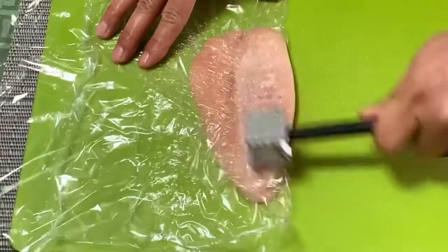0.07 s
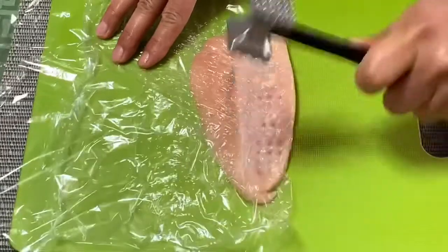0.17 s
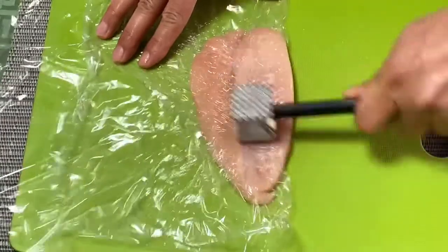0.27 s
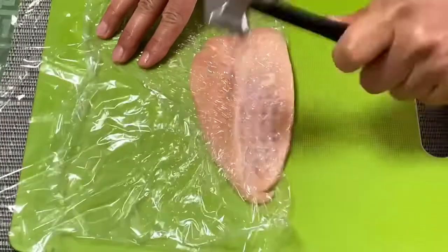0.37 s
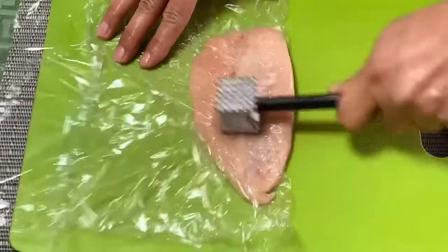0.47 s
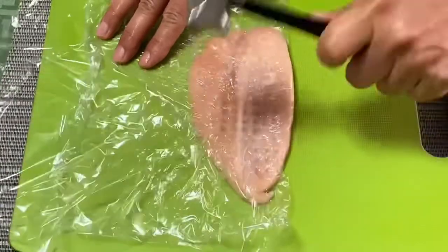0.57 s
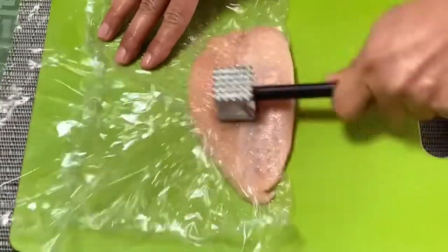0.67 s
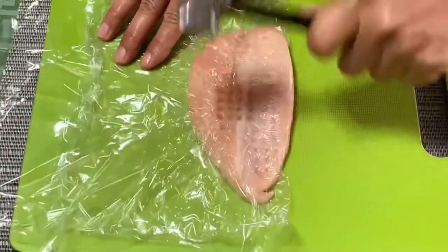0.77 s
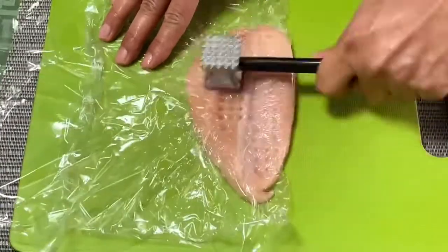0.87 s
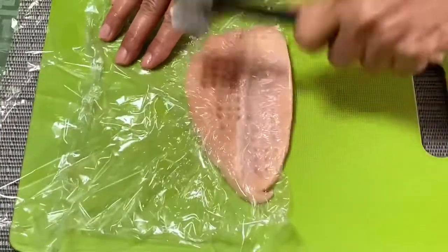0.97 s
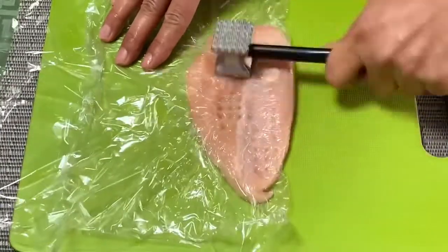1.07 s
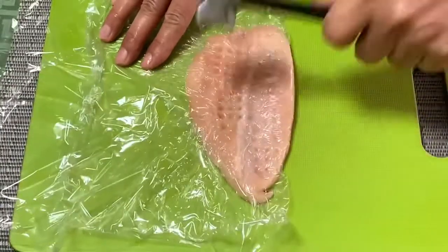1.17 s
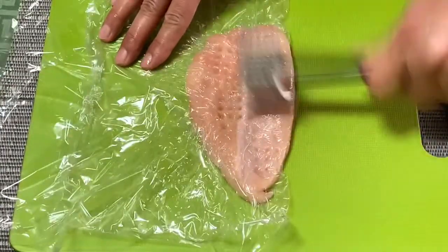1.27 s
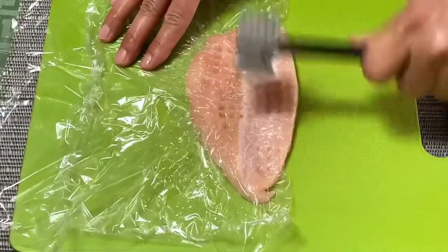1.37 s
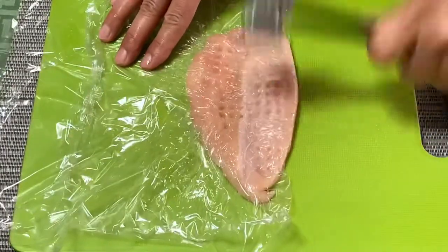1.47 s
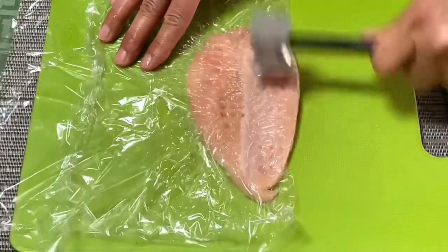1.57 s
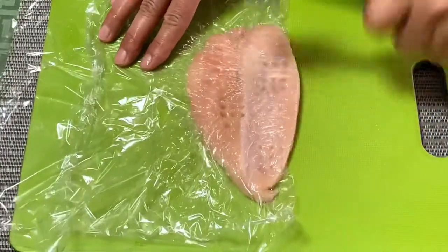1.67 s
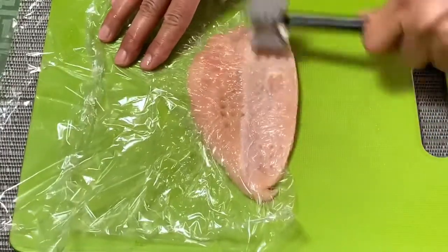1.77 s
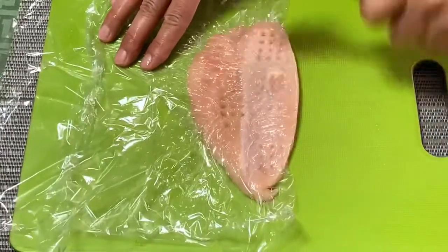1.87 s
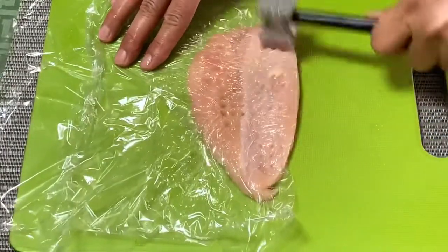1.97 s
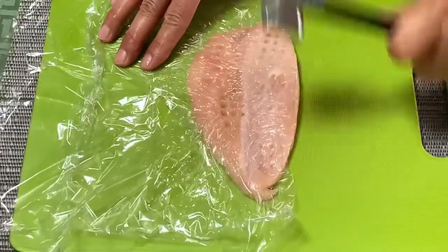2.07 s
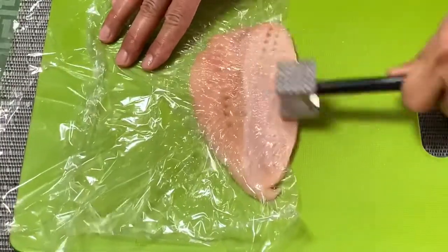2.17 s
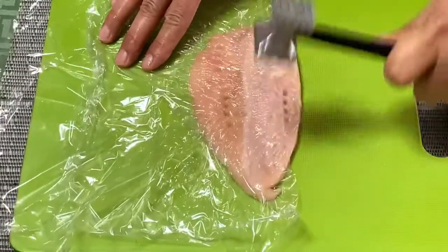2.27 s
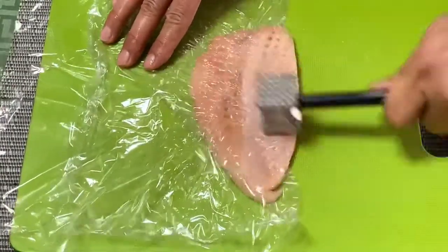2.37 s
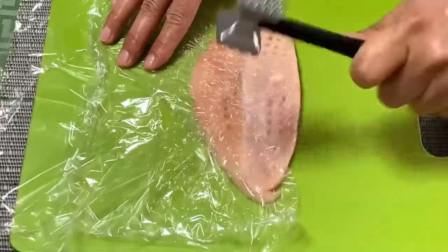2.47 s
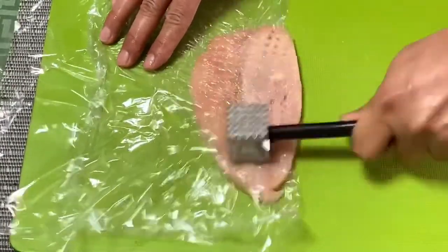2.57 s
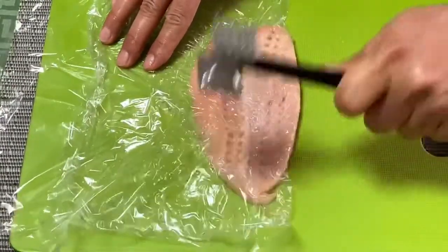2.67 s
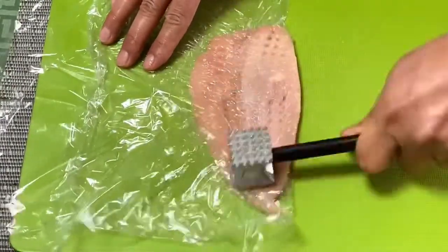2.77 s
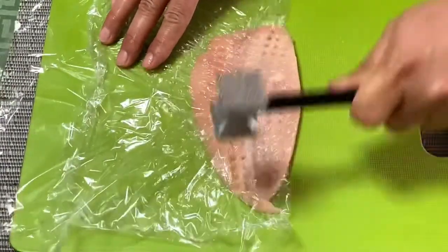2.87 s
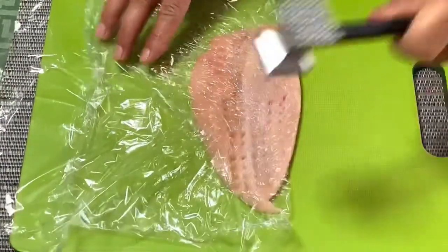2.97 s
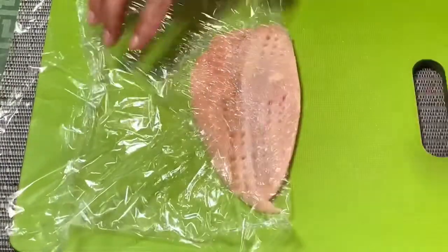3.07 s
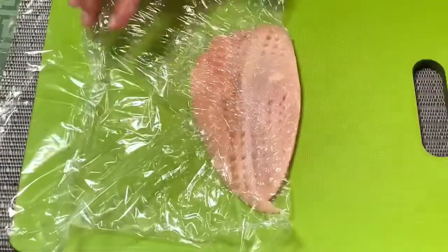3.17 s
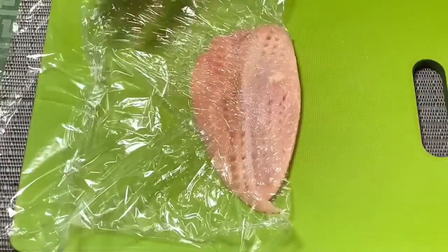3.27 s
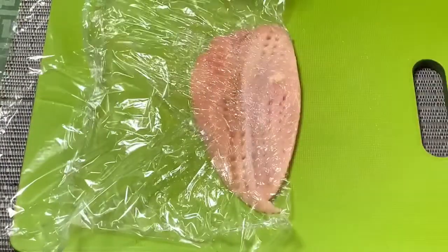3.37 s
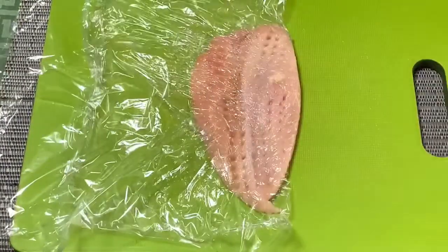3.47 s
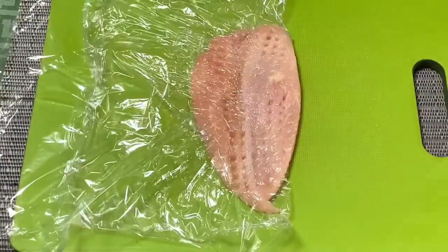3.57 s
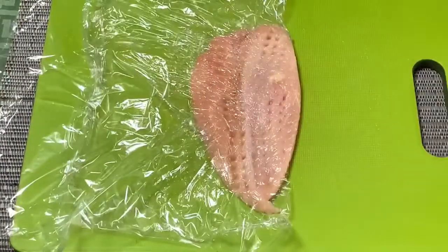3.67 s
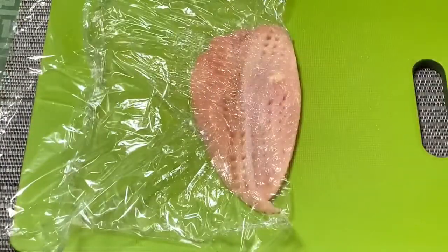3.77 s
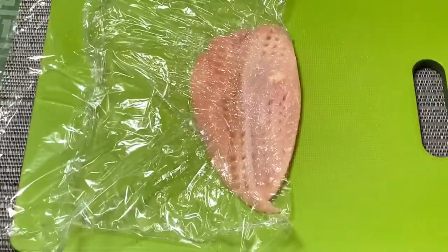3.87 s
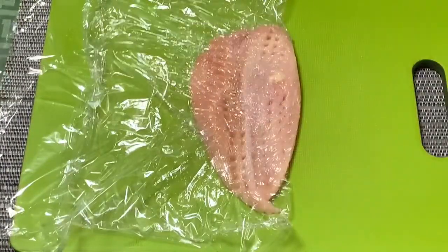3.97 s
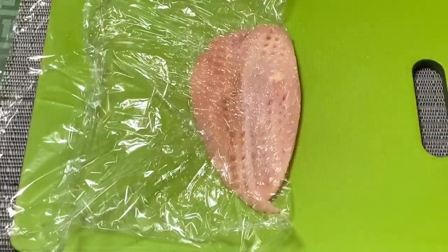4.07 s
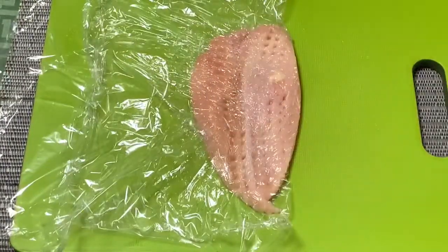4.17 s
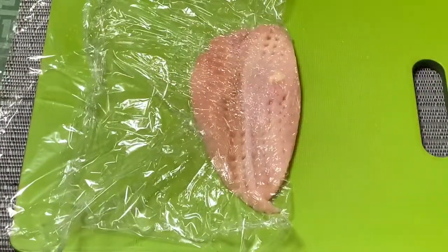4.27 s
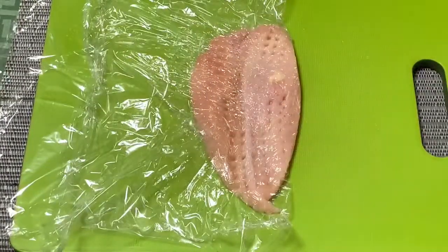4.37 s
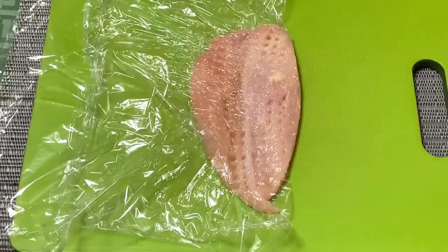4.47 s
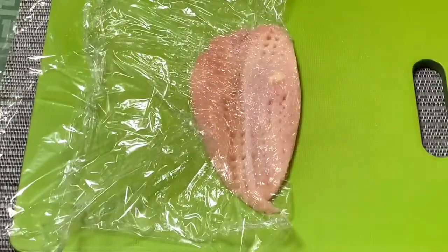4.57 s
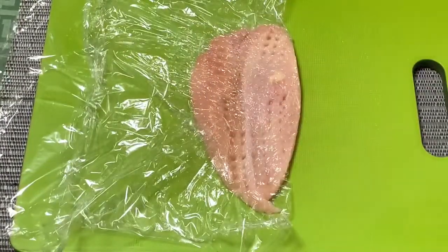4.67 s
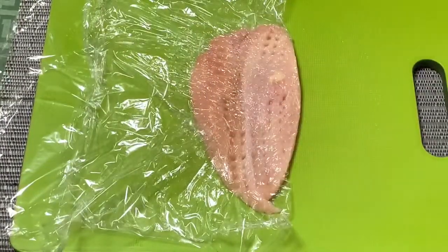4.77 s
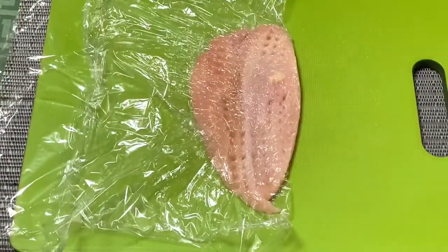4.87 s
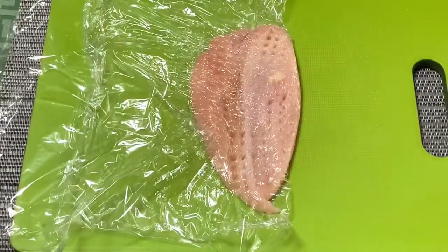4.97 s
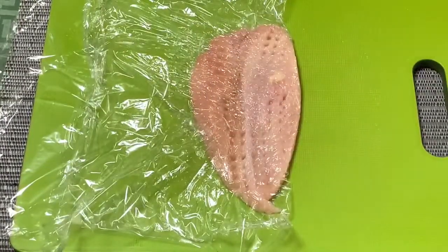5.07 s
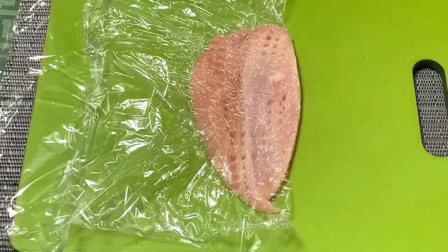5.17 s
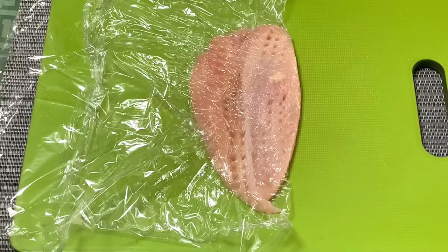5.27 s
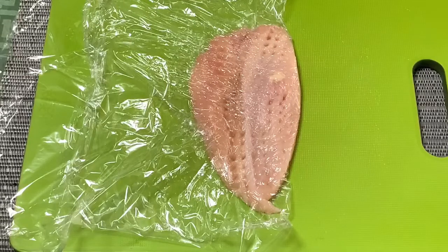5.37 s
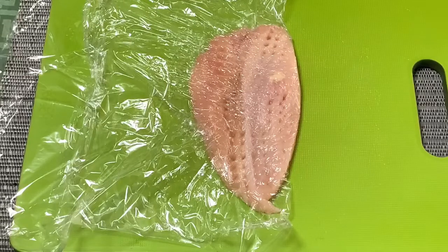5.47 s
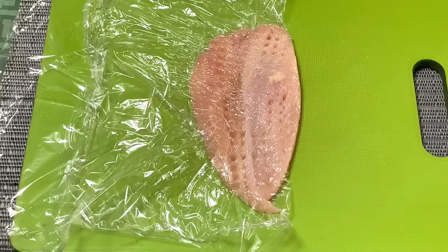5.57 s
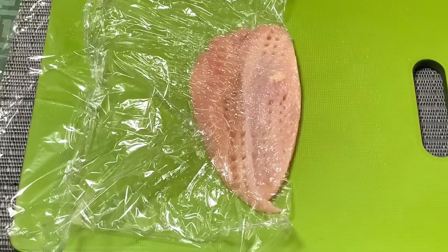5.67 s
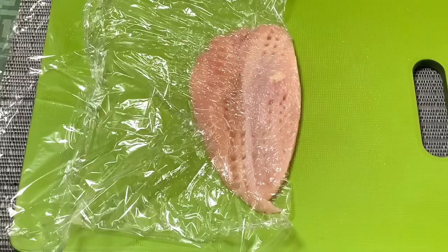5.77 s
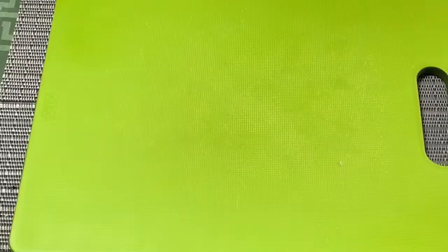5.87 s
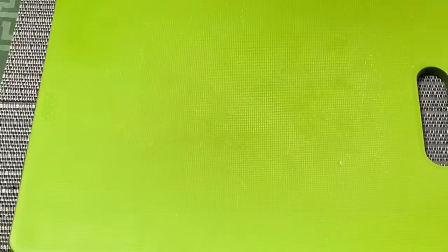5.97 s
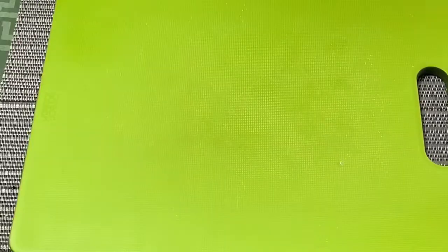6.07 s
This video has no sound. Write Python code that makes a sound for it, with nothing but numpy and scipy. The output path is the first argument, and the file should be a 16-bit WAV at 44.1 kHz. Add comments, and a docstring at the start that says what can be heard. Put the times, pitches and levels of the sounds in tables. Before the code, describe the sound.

From the very start, a metal mallet pounds chicken breast through plastic wrap on a plastic cutting board. About fourteen loud blows fall evenly, nearly five a second, the last at about 2.7 seconds. Each combines a bright crack on the wrap with a slap and a low, ringing thud from the board and counter, followed by a short kitchen echo. The blows are a little softer around 1 second and just after 2 seconds. The close microphone overloads slightly on the peaks.

From 3 seconds it is much quieter: a low appliance rumble and hum, with soft, grainy plastic rustling that comes and goes, mostly between 3.7 and 5 seconds. A few small ticks fall between 4 and 4.7 seconds, the clearest near 4.3. Around 5.8 to 6 seconds come another brief rustle, light ticks and a soft tap as the rumble sinks.

```python
"""Kitchen: a metal mallet pounds chicken breast through plastic wrap on a plastic board. Each blow cracks on
the wrap, sends a falling bending wave through board and counter and rings them. The room echoes; a phone close
above overloads. Afterwards only an appliance rumble and soft rustling with small ticks remain. Near the end the
background drops."""
import sys
import numpy as np
from scipy import signal
from scipy.fft import rfft, irfft, next_fast_len
from scipy.io import wavfile
from scipy.ndimage import uniform_filter1d

SR = 44100
rng = np.random.default_rng(int(sys.argv[2]) if len(sys.argv) > 2 else 0)


def transcribe(signal):
    """Save signal, clipped to [-1, 1], as a 16-bit WAV file at the path in sys.argv[1]."""
    frames = np.atleast_2d(signal).T
    limited = np.clip(frames, -1, 1)
    pcm = np.round(limited * 32767).astype(np.int16)
    wavfile.write(sys.argv[1], SR, pcm)


N = 269450
BLOW_N = 2 ** 14
BLOW_TIME_S, BLOW_FREQ_HZ = np.arange(BLOW_N) / SR, np.fft.rfftfreq(BLOW_N, 1 / SR) + 1e-3
LEFT_RIGHT = np.array([[1], [-1]])


def undb(db):
    """dB to gain."""
    return 10 ** (np.asarray(db) / 20)


def unit(x):
    """Scale to rms 1."""
    return x / np.sqrt(np.mean(x ** 2))


def decay(t, t60_s):
    """Exponential fall, 60 dB in t60_s."""
    return np.exp(-np.log(1000) * t / t60_s)


def bell(hz, centre_hz, width_oct):
    """Gaussian weight over log frequency."""
    return np.exp(-.5 * (np.log2(hz / centre_hz) / width_oct) ** 2)


def on_log(hz, table, column=1):
    """Interpolate a table over log frequency."""
    table = np.array(table, float)
    return np.interp(np.log(np.maximum(hz, 1)), np.log(table[:, 0]), table[:, column])


def band(hz, width_oct, size):
    """Bell-shaped noise band, rms 1."""
    f = np.fft.rfftfreq(size, 1 / SR) + 1e-3
    return unit(irfft(rfft(rng.standard_normal(size)) * bell(f, hz, width_oct), size))


def walk(rate_hz):
    """Smooth random wander, rms 1."""
    hold = int(SR / rate_hz)
    steps = np.repeat(rng.standard_normal(N // hold + 1), hold)
    return unit(uniform_filter1d(uniform_filter1d(steps, hold), hold)[:N])


def pair(mid, side, share):
    """Mid and side to left and right."""
    share = np.clip(share, 0, 1)
    return np.array([mid + share * side, mid - share * side]) / np.sqrt(1 + share ** 2)


def add(out, x, start_s):
    """Mix stereo x into out."""
    i = int(round(start_s * SR))
    a, b = max(i, 0), min(i + x.shape[1], N)
    out[:, a:b] += x[:, a - i:b - i]


def flickering_bands(density_db, centres_hz, side_shares, envelope_db, flicker_db, rate_hz):
    """Stereo noise bands, each flickering about its level curve envelope_db(hz)."""
    bands_db = on_log(centres_hz, density_db) + 10 * np.log10(centres_hz)
    bands_db -= 10 * np.log10(np.sum(10 ** (bands_db / 10)))
    out = 0
    for hz, db in zip(centres_hz, bands_db):
        level_db = db + flicker_db * walk(rate_hz) + envelope_db(hz)
        out += undb(level_db) * pair(band(hz, .15, N), band(hz, .15, N), on_log(hz, side_shares))
    return out


def wrap_crack(level_db, pitch_hz):
    """Mallet teeth meet the wrap: a short burst, one strong pitch over broad crackle."""
    t, peak_s = BLOW_TIME_S, .002
    burst = (t / peak_s) ** 4 * np.exp(4 - 4 * t / peak_s)
    tone = np.sin(2 * np.pi * pitch_hz * t)
    crackle = pair(band(5400, 1, BLOW_N), band(7700, .9, BLOW_N), .76)
    return undb(level_db) * (.68 * burst ** 2 * tone + .64 * burst * crackle)


def head_push(slap_db, slap_hz, shove_db, shove_hz):
    """Spectrum of the mallet head's push: a bright slap over a dull shove."""
    bright, dull = bell(BLOW_FREQ_HZ, slap_hz, .45), bell(BLOW_FREQ_HZ, shove_hz, .54)
    slap = 2 * undb(slap_db) * bright / bright.sum()
    shove = 1.4 * undb(shove_db) * dull / dull.sum()
    return BLOW_N / 2 * (slap + shove)


def board_ring(boom_db, thump_db, knock_db, knock_hz):
    """Board and counter ring; each spot struck favours the modes near knock_hz."""
    # Modes: pitch_hz, level_db, t60_s
    modes = [(57, -8, 0.13), (126, -43.5, 0.046), (145.65, 0, 0.27), (185.9, -11.5, 0.36), (215, -3, 0.091),
             (246.2, -18.5, 0.29), (310, -9, 0.056), (328.6, -10, 0.16), (356, -12, 0.091),
             (412, -12, 0.12), (475, -11, 0.056), (516, -13, 0.15), (580, -23.5, 0.06),
             (690.6, -11.5, 0.15), (1313, -33, 0.13), (2000, -36.5, 0.33), (3590, -45, 0.37)]
    boom_top_hz, thump_top_hz = 165, 270
    t, out = BLOW_TIME_S, 0
    for hz, db, t60_s in modes:
        detune, scatter, skew = rng.standard_normal(3)
        if hz < boom_top_hz:
            db += boom_db
        elif hz < thump_top_hz:
            db += thump_db
        else:
            db += knock_db - 3 + 6 * bell(hz, knock_hz, .17)
        db += 2.5 * scatter * min(hz / 300, 1)
        port_rad = skew * min(hz / 2290, .8) * LEFT_RIGHT  # upper modes differ between mic ports
        phase_rad = 2 * np.pi * hz * (1 + .0072 * detune) * t + port_rad
        build_up = 1 - np.exp(-t * hz / .25)  # quarter-cycle time constant
        out += undb(db) * build_up * np.sin(phase_rad) * decay(t, t60_s)
    return out


def bending_wave(spectrum):
    """The meat passes the force on late; bending delay then falls with the root of frequency."""
    f, meat_delay_s, delay_at_100hz_s = BLOW_FREQ_HZ, .00148, .008986
    lag_cycles = f * meat_delay_s + 2 * delay_at_100hz_s * np.sqrt(100 * f)
    return irfft(spectrum * np.exp(-2j * np.pi * lag_cycles), BLOW_N)


def kitchen_echo(knock_db, knock_hz, slap_db, crack_db):
    """Dense echo of one blow, dying band by band."""
    # Room response: centre_hz, level_db, t60_s, side_share
    room = [(180, -23.5, 0.27, 0), (335, -19.5, 0.31, 0.35), (690, -18.5, 0.27, 0.62),
            (1000, -23.5, 0.28, 0.8), (1980, -27, 0.25, 1), (3994, -26, 0.28, 0.84), (7180, -29, 0.34, 1),
            (9420, -26.5, 0.27, 0.82), (12800, -33.5, 0.29, 0.2)]
    drive_db = [(600, knock_db), (2000, .53 * knock_db + .22 * slap_db), (8000, .47 * crack_db)]
    t, out = BLOW_TIME_S, 0
    early = .5 * np.exp(-t / .0088)  # near surfaces answer first
    for hz in 180 * 2 ** np.arange(0, 6.6, 1 / 3):
        noise = pair(band(hz, .14, BLOW_N), band(hz, .14, BLOW_N), on_log(hz, room, column=3))
        db = on_log(hz, room) + on_log(hz, drive_db) + 4 * bell(hz, knock_hz, .15)
        tail = decay(t, on_log(hz, room, column=2))
        out += undb(db) * noise * (early + tail)
    return out * np.clip((t - .003) / .0022, 0, 1)


def mallet_blow(thump_db, boom_db, knock_db, knock_hz, crack_db, crack_hz, slap_db, slap_hz):
    """One blow: wrap crack, push and ring carried by the bending wave, echo."""
    fade = np.clip((BLOW_TIME_S[-1] - .03 - BLOW_TIME_S) / .08, 0, 1)
    crack = wrap_crack(crack_db, crack_hz)
    push = head_push(slap_db, slap_hz, shove_db=thump_db, shove_hz=1.1 * knock_hz)
    ring = board_ring(boom_db, thump_db, knock_db, knock_hz)
    body = bending_wave(push + rfft(ring * fade))
    echo = kitchen_echo(knock_db, knock_hz, slap_db, crack_db)
    pan_db = -.36  # left minus right
    return fade * (crack + body + echo) * undb(LEFT_RIGHT * pan_db / 2)


def appliance_rumble():
    """Low noise with wavering hum tones; the bass under 80 Hz swells briefly."""
    # Noise spectrum: freq_hz, density_db
    spectrum = [(15, -47), (25, -3), (84, -16.5), (102, -12), (157, 0), (270, -34), (301, -14.5),
                (416, -21), (607, -19.5), (962, -27.5), (1190, -27.5), (2610, -34.5), (3080, -38.5),
                (13200, -65.5), (16000, -81)]
    # Bass swells: peak_s, boost_db
    swells = [(3.1, 0), (3.812, 16.5), (4.7, 7), (4.9, 7)]
    # Hum tones against the noise: pitch_hz, level_db
    hum = [(120, -13), (161, -10), (242, -16), (301, -18.5), (452, -22), (608, -31), (1195, -28.5),
           (1480, -29), (2589, -31.5), (3700, -36)]
    # Overall level: time_s, level_db
    levels = [(0, -29.5), (3, -36), (3.5, -40), (4.3, -38.5), (5.72, -39), (5.76, -40), (6.11, -47.5)]
    t, swell_width_s = np.arange(N) / SR, .049
    bass_db = sum(db * np.exp(-.5 * ((t - peak_s) / swell_width_s) ** 2) for peak_s, db in swells)
    centres_hz = 25 * 2 ** np.arange(0, 9.4, 1 / 3)
    side_shares = [(60, .25), (150, .13), (700, .9), (4000, 1)]
    out = flickering_bands(spectrum, centres_hz, side_shares, lambda hz: bass_db * (hz < 80),
                           flicker_db=.62, rate_hz=12)
    for hz, db in hum:
        out += undb(db + 2.4 * walk(3.22)) * band(hz, 12 / hz, N)
    return undb(np.interp(t, *np.transpose(levels))) * out


def rustle_envelope_db(hz):
    """Level of one band: each rustle rises and falls; their powers add."""
    # Rustles: peak_s, level_db, rise_20db_s, fall_20db_s, tilt_db_per_oct
    rustles = [(2.974, -50.5, .2, 0.3, 3), (3.114, -47.5, 0.054, 0.07, -0.5), (3.34, -65, 0.095, .15, 3.5),
               (3.42, -58.5, .07, .12, -2.2), (3.77, -48.5, 0.098, 0.17, -3),
               (3.854, -42.5, 0.093, 0.12, -.6), (4.066, -44, 0.032, 0.066, 2.5),
               (4.2, -47.5, 0.24, .15, -2.2), (4.258, -40, 0.018, 0.083, -2), (4.38, -47.5, 0.18, 0.1, 0),
               (4.52, -52.5, 0.12, 0.093, 2.5), (4.566, -45, .015, 0.14, -4.5),
               (4.861, -41.5, 0.35, 0.21, -0.4), (5.799, -44, .012, .2, -1.1),
               (5.98, -46.5, .08, 0.44, -1.5)]
    roundness = 1.7  # 1 pointed, 2 bell
    t, power = np.arange(0, N, 64) / SR, 1e-12
    for peak_s, db, rise_s, fall_s, tilt in rustles:
        from_peak = np.where(t < peak_s, (peak_s - t) / rise_s, (t - peak_s) / fall_s)
        power += undb(db - 20 * from_peak ** roundness + tilt * np.log2(hz / 5000)) ** 2
    return np.interp(np.arange(N) / SR, t, 10 * np.log10(power))


def rustling():
    """Soft bright noise, grainy as from many tiny creases."""
    # Rustle spectrum: freq_hz, density_db
    spectrum = [(500, -16), (900, -5), (1500, -0.5), (2940, -3.5), (4640, 1.5), (7000, -5), (10000, -1),
                (13500, -12), (16000, -1)]
    centres_hz = 600 * 2 ** np.arange(0, 4.8, 1 / 3)
    side_shares = [(1000, .92), (8000, .68)]
    noise = flickering_bands(spectrum, centres_hz, side_shares, rustle_envelope_db,
                             flicker_db=1.84, rate_hz=25)
    grain_db = 1.1 * walk(rate_hz=300)
    return undb(grain_db) * noise


def small_ticks():
    """Ticks among the rustling: a snap, then a pitched noise tail."""
    # Ticks: start_s, level_db, pitch_hz, t60_s
    ticks = [(4.047, -47, 3460, 0.25), (4.254, -29, 4800, 0.18), (4.564, -40.5, 3600, 0.11),
             (4.6294, -42, 2040, 0.14), (5.7922, -33.5, 9500, 0.079), (5.796, -40, 1400, 0.058),
             (5.965, -35, 343, 0.22), (5.971, -45, 1650, 0.14)]
    size, snap_s = SR // 4, .001
    t, out = np.arange(size) / SR, np.zeros((2, N))
    for start_s, db, hz, t60_s in ticks:
        narrow = pair(band(hz, .14, size), band(hz, .29, size), .52)
        broad = pair(band(hz, .55, size), band(hz, .99, size), .97)
        envelope = np.exp(-t / snap_s) + decay(t, t60_s)
        add(out, undb(db) / 2 * (narrow + .5 * broad) * envelope, start_s)
    return out


def scene():
    """Blows over the rumble, then rustling and ticks."""
    # Blows: time_s, thump_db, boom_db, knock_db, knock_hz, crack_db, crack_hz, slap_db, slap_hz
    blows = [(-0.010, 0.5, -4, 3.5, 530, -17, 7000, -20, 1700),
             (0.197, 3, -0.4, 3.5, 388.6, -5, 7390, -8, 2090),
             (0.412, 6, 1.5, 3, 500, -5.5, 7500, -14.5, 1250),
             (0.616, 1.5, 1.5, 4, 457, -7.5, 6120, -17, 1440),
             (0.836, 0.8, .6, -5, 320, -9.5, 5960, -13.5, 1780),
             (1.04, 1, 3, -4.5, 337, -10.5, 6110, -7, 1950),
             (1.262, 4.5, 4.5, 3.5, 310, -11.5, 4650, -14, 1860),
             (1.476, 5.5, 3.5, 2.5, 360, -8, 9900, -18.5, 2280),
             (1.678, 4.5, 4.5, 1.5, 335, -10, 4570, -16.5, 1750),
             (1.882, 5, 2.5, 1.5, 325, -13, 8950, -9.5, 1670),
             (2.095, -1, -6, -3.5, 314, -23.5, 4370, -20, 1900),
             (2.293, -0.7, -1, -1.4, 312, -17.5, 4560, -23.5, 2030),
             (2.532, 3, -0.8, 2, 297, -8, 5180, -8.5, 1960),
             (2.737, 5.5, -0.1, 5.5, 417, -5, 6830, -14, 1940)]
    lead_s = .0015
    out = appliance_rumble() + rustling() + small_ticks()
    for time_s, *controls in blows:
        add(out, mallet_blow(*controls), time_s - lead_s)
    return out


def record(dry):
    """Phone: two mic ports hear the treble out of step; peaks flatten, both band edges are cut."""
    # Phase between the ports: freq_hz, left_lead_rad
    port_phase = [(0, 0), (3900, .5), (5200, 3.3), (6100, .9), (6900, 1.2), (16100, -16.5)]
    low_cut_hz, shelf_hz, top_hz, knee = 40, 14700, 16300, 9
    size = next_fast_len(N + 4096)
    f = np.fft.rfftfreq(size, 1 / SR)
    skew = np.exp(.5j * np.interp(f, *np.transpose(port_phase)) * LEFT_RIGHT)
    low_cut = f ** 4 / (f ** 4 + low_cut_hz ** 4)
    shelf = .1 + .9 / (1 + (f / shelf_hz) ** 40)
    ports = irfft(rfft(dry, size) * skew * low_cut * shelf, size)[:, :N]
    overloaded = ports / (1 + np.abs(ports) ** knee) ** (1 / knee)
    lowpass = signal.ellip(8, .2, 55, top_hz, fs=SR, output="sos")
    return np.clip(signal.sosfilt(lowpass, overloaded), -1, 1)


dry = scene()
out = record(dry)
transcribe(out)
```